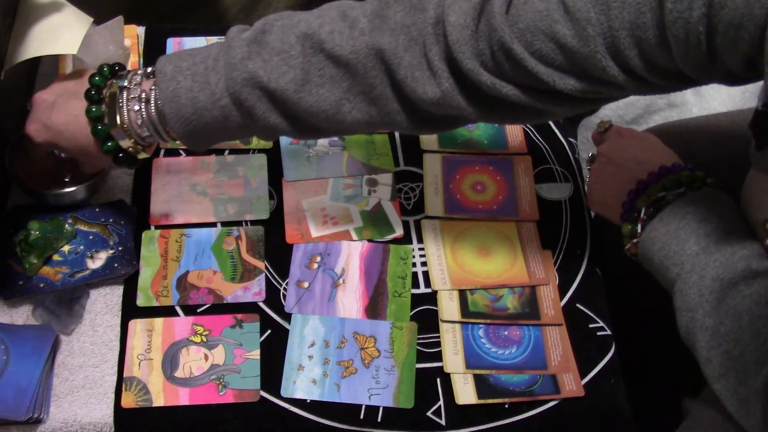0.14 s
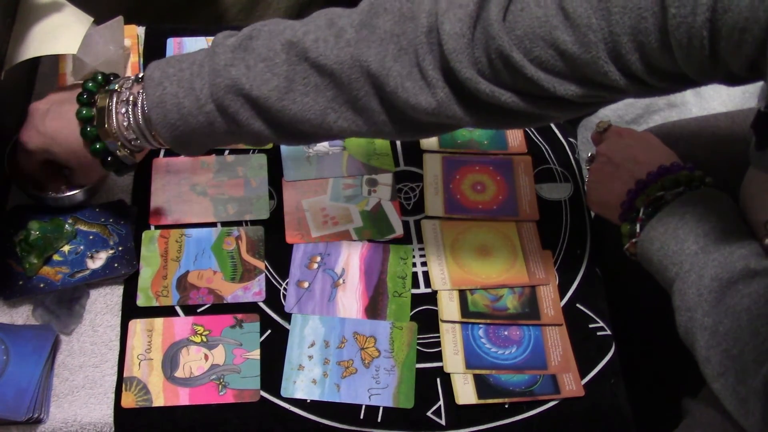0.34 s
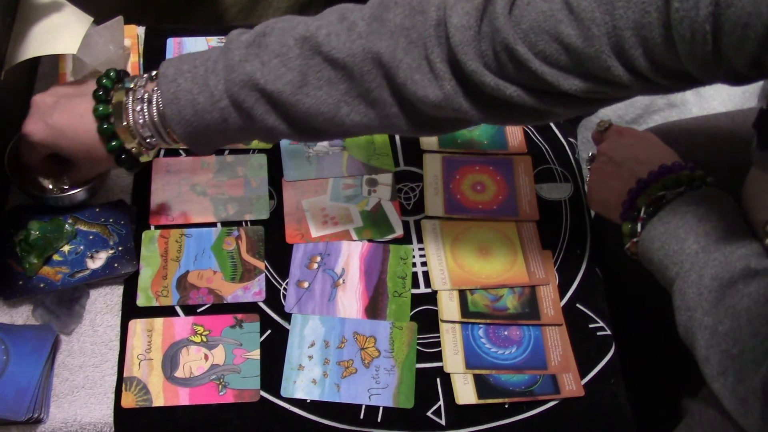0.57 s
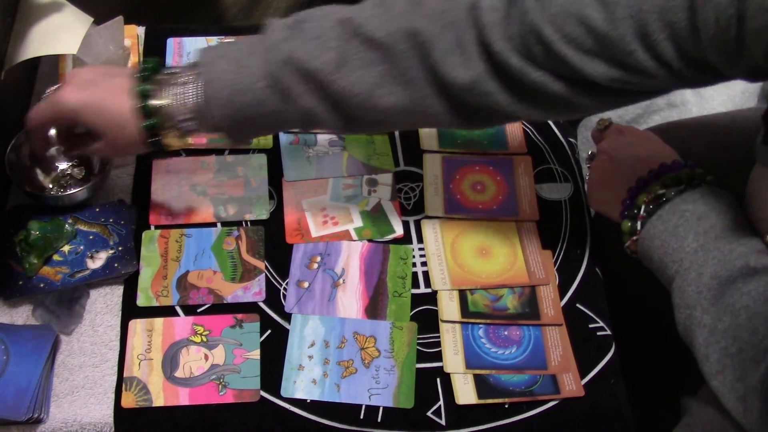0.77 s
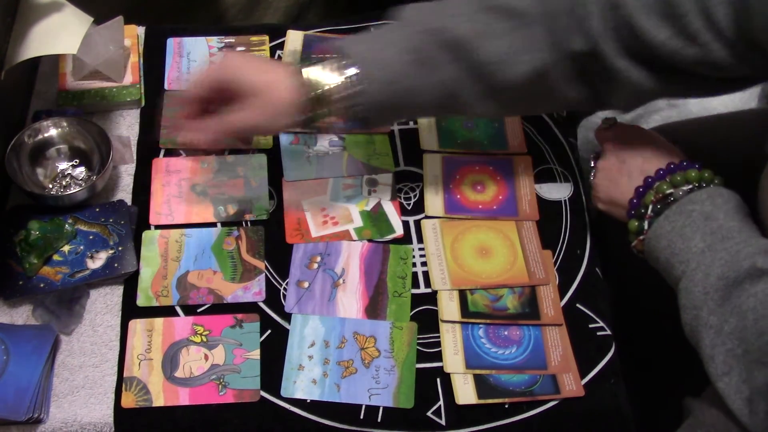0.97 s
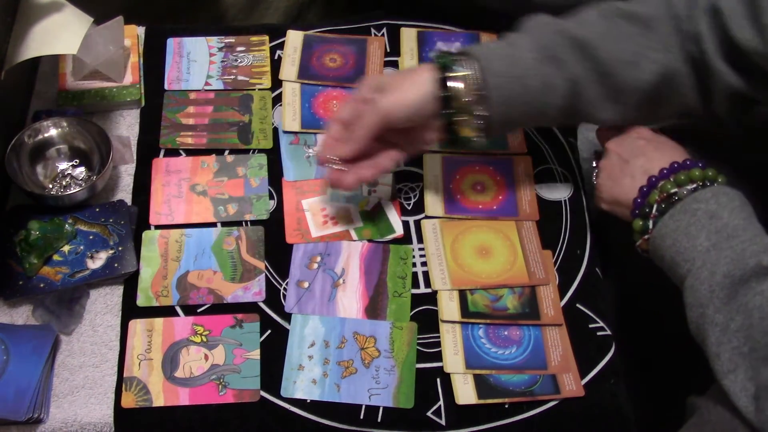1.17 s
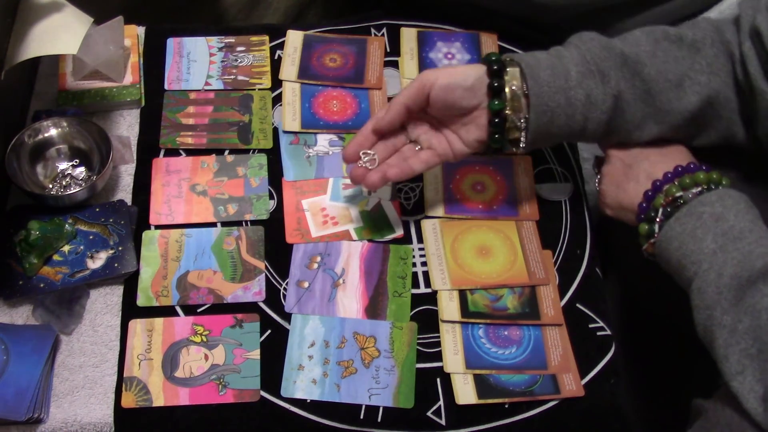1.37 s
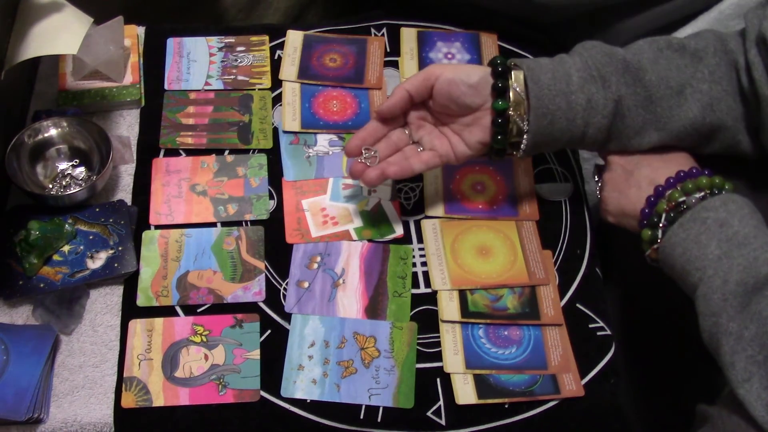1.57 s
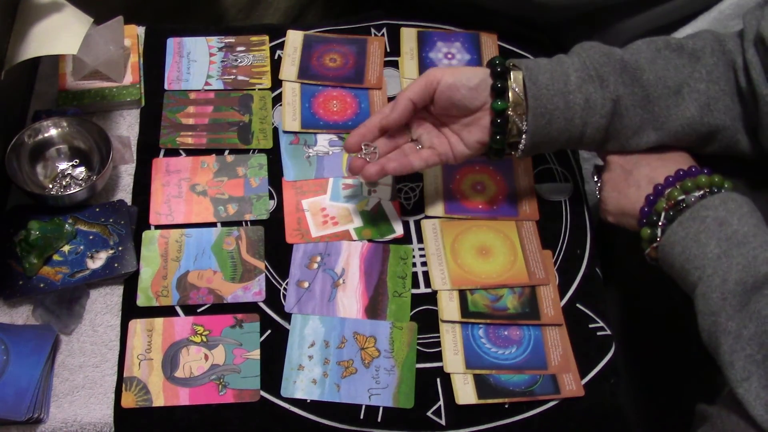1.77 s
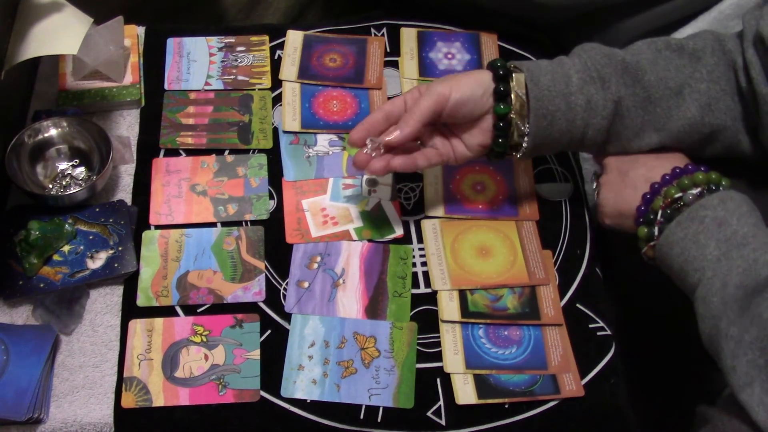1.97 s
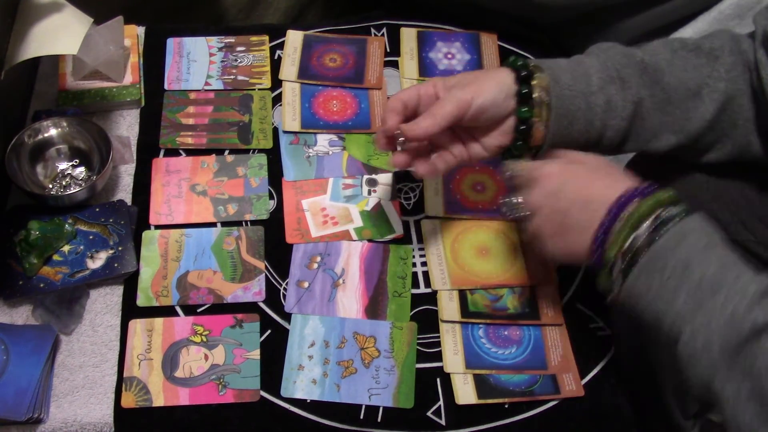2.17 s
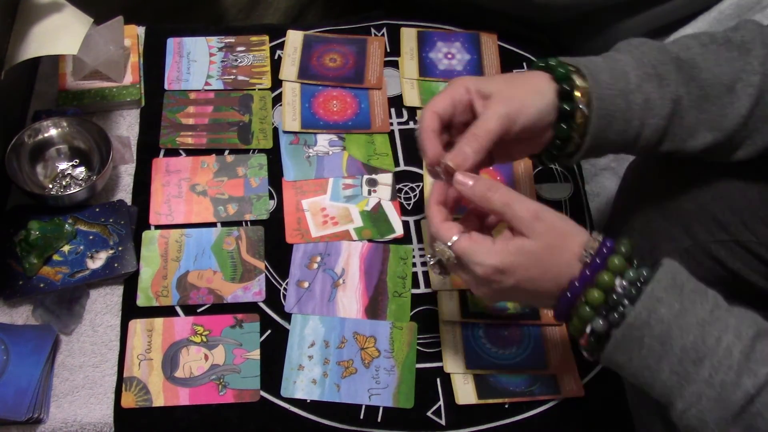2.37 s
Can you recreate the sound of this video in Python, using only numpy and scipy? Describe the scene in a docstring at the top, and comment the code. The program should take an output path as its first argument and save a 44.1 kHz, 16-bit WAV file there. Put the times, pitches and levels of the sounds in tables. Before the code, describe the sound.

Small metal charms jingle and clink in a steel bowl, then tick faintly in a hand.

```python
"""A quiet room, the microphone close to a steel bowl of small metal charms. Fingers rummage in the heap:
countless light contacts and some hard clinks ring charms and bowl, the heap knocks on the bottom, and
charms drag along the wall. From 0.8 s the hand lifts a few away: chain links rustle, a sleeve brushes,
and the charms tick in the palm under rubbing fingertips. Last, bracelet beads click as the arms move."""
import sys
import numpy as np
from scipy import signal
from scipy.fft import rfft, irfft
from scipy.io import wavfile

SR = 44100
rng = np.random.default_rng(int(sys.argv[2]) if len(sys.argv) > 2 else 0)


def to_wav(s):
    """Save 16-bit WAV."""
    ch = np.atleast_2d(s).T  # columns
    pcm = np.round(np.clip(ch, -1, 1) * 32767)  # PCM
    wavfile.write(sys.argv[1], SR, pcm.astype(np.int16))


N = 107295
T = np.arange(N) / SR
AGE, TAIL = T[:SR // 16], T[:SR // 3]  # time since a blow: short sounds, long rings

# room tone spectrum: f/Hz, level/dB
AIR_COLOUR = [(20, -30.5), (100, -11.5), (150, -8), (220, 0.5), (330, -5), (500, -7.5), (2000, -18),
              (9000, -29.5), (16000, -40)]
# how the loaded bowl radiates: f/Hz, level/dB
BOWL_COLOUR = [(100, -34.5), (480, -21.5), (800, -15), (1220, -12), (1550, -2.5), (1950, -14.5),
               (2450, -14), (2900, -7.5), (3350, -8), (3880, -3), (4250, -8.5), (5000, -8.5), (5450, -1),
               (5950, -3.5), (6500, -9), (8500, -9), (9300, -12.5), (10100, -8), (11900, -21.5),
               (16000, -24)]
# stirring of the heap: t/s, level/dB
STIR_CURVE = [(0, -34), (.04, -56), (0.063, -28.5), (.082, -36), (.112, -28.5), (.165, -26), (.205, -26.5),
              (.236, -40), (.275, -25.5), (0.341, -39.5), (0.399, -27), (.428, -31.5), (.446, -40),
              (0.499, -36), (0.551, -27.5), (.612, -28), (0.638, -25.5), (.70, -40.5), (0.746, -52.5)]
# lasting modes of the bowl: f/Hz, level/dB, t60/s
BOWL_MODES = [(1597, -11, .15), (3137, -13, .12), (3610, -9, .11), (3718, -7, .11), (3837, -3, .13),
              (3994, -6, .11), (5390, -4, .09)]
# hard clinks: t/s, level/dB, main mode f/Hz, its relative level/dB
CLINKS = [(0.0195, -35, 5500, -8.5), (0.0485, -26.5, 5630, -10.5), (0.053, -20.5, 5380, -3.5),
          (0.06, -14.5, 3030, -9), (0.0917, -19, 5700, -13.5), (0.1012, -16.5, 4100, -12),
          (0.1056, -17.5, 5390, -1), (0.111, -9, 5530, -1), (0.1204, -18, 5750, 0), (0.1269, -7, 5400, 7),
          (0.1378, -17.5, 3887, -1.5), (0.1579, -22, 9970, -1), (.193, -23, 3820, 3),
          (0.2492, -28, 5655, -9.5), (0.2566, -22, 7950, -7.5), (0.356, -24, 5860, -13),
          (0.3625, -16, 8570, -12), (0.3857, -18.5, 6060, -1), (0.4073, -20, 5640, 5.5),
          (0.428, -24, 5500, 0.5), (0.527, -22.5, 5660, -6), (0.5484, -17.5, 5360, -5),
          (0.559, -19, 5620, 0), (0.6626, -15.5, 3620, -6.5), (0.677, -22.5, 5670, 4),
          (0.6969, -27.5, 3720, -3.5), (0.7029, -25.5, 5870, -6)]
# heap knocking on the bottom: t/s, level/dB
KNOCKS = [(0.099, -18), (0.1046, -22), (.1118, -27.5), (0.1368, -22), (0.1588, -27), (.198, -29.5),
          (.407, -34), (.4615, -29.5), (.468, -32.5)]
# modes of the loaded bottom: f/Hz, level/dB, t60/s
BOTTOM_MODES = [(930, -5, .032), (1120, -6, .025), (1440, 0, .034)]
# band edges of the thud: f/Hz
THUD_BAND = [560, 1600]
# charms struck free: t/s, level/dB, f/Hz, t60/s
FREE_RINGS = [(.1118, -20, 10592, .22), (.1278, -24, 5390, .2), (.1278, -25, 3837, .3),
              (.1585, -20, 9838, .11)]
# dragging along the wall: t/s, level/dB
DRAG_CURVE = [(.52, -55.5), (.575, -31.5), (.64, -31), (.70, -39), (.73, -58)]
# modes the dragging sustains: f/Hz, level/dB
WALL_MODES = [(3530, -2), (3625, -1), (3880, -1), (4002, 2), (10030, -1), (10600, 1)]
# chain links rustling: t/s, level/dB
RUSTLE_CURVE = [(.78, -79), (1.02, -64), (1.12, -90.5)]
# contact noise of links and held charms: f/Hz, level/dB
TICK_COLOUR = [(200, -33.5), (2000, -18), (5800, -11.5), (7200, -0.5), (10000, -4), (13000, -18.5),
               (16000, -20.5)]
# sleeve brushing: t/s, level/dB
SLEEVE_CURVE = [(.8, -75), (1.03, -68.5), (1.27, -73), (1.35, -56), (1.43, -65), (1.9, -78), (2.07, -67),
                (2.18, -66.5), (2.205, -58), (2.26, -78)]
# its spectrum: f/Hz, level/dB
SLEEVE_COLOUR = [(100, -19.5), (1100, 8), (2000, -3), (2550, 3.5), (4000, -8), (9000, -11), (16000, -19)]
# ticks in the palm: t/s, level/dB, main mode f/Hz, t60/s
TICKS = [(0.832, -44.5, 9400, 0.0066), (0.914, -47, 9000, .009), (1.0419, -40.5, 8360, 0.02),
         (1.1643, -38.5, 7600, 0.019), (1.1864, -45.5, 9700, 0.028), (1.2189, -42, 10420, 0.022),
         (1.4107, -42, 13000, 0.022), (1.419, -39.5, 9130, 0.016), (1.952, -48, 7070, 0.035),
         (2.003, -43, 7920, .03), (2.012, -41, 7420, 0.047), (2.041, -44.5, 7700, 0.11),
         (2.0593, -40.5, 7800, 0.036), (2.069, -44, 6920, 0.045), (2.118, -40.5, 7180, 0.044),
         (2.132, -42, 7570, 0.056), (2.151, -46, 7800, 0.095), (2.1723, -42.5, 10400, 0.038),
         (2.215, -37, 9360, 0.029), (2.225, -33.5, 9440, 0.016)]
# modes of the held charms: f/Hz, level/dB
HELD_MODES = [(7110, -3), (7910, -28), (8690, 3), (9440, 1), (10400, 6), (11800, -1.5), (12900, 1),
              (15100, -6)]
# fingertips sliding: t/s, level/dB
SLIDE_CURVE = [(1.2, -90), (1.4, -71), (1.85, -72), (2, -89.5)]
# soft finger rubs: t/s, level/dB
RUBS = [(1.522, -54.5), (1.922, -53.5)]
# bracelet bead clicks: t/s, level/dB, f/Hz
BEADS = [(2.1914, -32, 5010), (2.2734, -43, 11900), (2.2844, -51, 10400), (2.3119, -42, 8250),
         (2.3406, -49, 8500)]
# their contact noise: f/Hz, level/dB
BEAD_COLOUR = [(200, -35), (1200, -7.5), (3100, -1), (4000, -12), (5000, -1), (8300, 6), (12000, -9),
               (16000, -16)]

STIR_END_S, CLICK_T60_S = .74, .007


def amp(db):
    """Decibels to gain."""
    return 10 ** (np.asarray(db) / 20)


def unit(x):
    """Scale to unit energy."""
    return x / np.sqrt(np.sum(x ** 2))


def fade(t60, age):
    """Exponential decay, 60 dB down after t60 seconds."""
    return np.exp(-np.log(1000) * age / t60)


def tone(hz, t60, age=AGE):
    """One dying mode."""
    return np.sin(2 * np.pi * hz * age) * fade(t60, age)


def crack(t60, age=AGE):
    """The brief noise of a contact."""
    return unit(rng.standard_normal(len(age)) * fade(t60, age))


def band(x, hz, kind):
    """Gentle high-pass or band-pass."""
    return signal.lfilter(*signal.butter(2, hz, kind, fs=SR), x)


def colour(x, points, size=2048):
    """Causal filter through (f/Hz, level/dB) points that keeps the power of white noise."""
    hz, db = np.array(points).T
    bins_hz = np.arange(size // 2 + 1) * SR / size
    gain = amp(np.interp(np.log(bins_hz + 1), np.log(hz), db))
    cepstrum = irfft(np.log(gain))
    cepstrum[1:size // 2] *= 2  # fold to minimum phase
    cepstrum[size // 2 + 1:] = 0
    impulse = unit(irfft(np.exp(rfft(cepstrum))))
    return signal.fftconvolve(x, impulse)[:len(x)]


def add(track, s, db, sound, rise_s=.001):
    """Lay a blow on the track; its level is its energy spread over 2 ms."""
    start = max(int(s * SR), 0)
    blow = unit(sound * (1 - np.exp(-AGE / rise_s))) * np.sqrt(SR * .002)
    track[start:start + len(AGE)] += amp(db) * blow[:N - start]


def along(x, curve, length_s=N / SR):
    """Give a texture of this length the level of a (t/s, level/dB) curve."""
    return unit(x) * np.sqrt(length_s * SR) * amp(np.interp(T, *np.array(curve).T))


def room_tone(level_db=-56.5, hum_hz=178, hum_db=-70.5):
    """Steady air of the room with a faint hum, wider in the bass."""
    mid, side = (amp(level_db) * colour(rng.standard_normal(N), AIR_COLOUR) for _ in range(2))
    side_bass = signal.lfilter(*signal.butter(1, 562, fs=SR), side)
    side = amp(-15) * side_bass + amp(-8.5) * side
    mid += amp(hum_db) * np.sqrt(2) * np.sin(2 * np.pi * hum_hz * T)
    return np.array([mid + side, mid - side])


def charm(mode_count=28, mean_t60=.017):
    """One charm touched in the heap: a crack and its own short modes, coloured by the bowl."""
    ring = sum(tone(2500 + 13000 * pitch, mean_t60 * (.5 + decay)) * (weight - .5)
               for pitch, decay, weight in rng.random((mode_count, 3)))
    return unit(colour(unit(ring) + amp(4) * crack(t60=.011), BOWL_COLOUR))


def stirred_heap(count=80, contacts_per_s=1600):
    """Stirred charms touch densely, mostly lightly, now and then harder."""
    out = np.zeros(N)
    charms = [charm() for _ in range(count)]
    contacts = rng.random((int(STIR_END_S * contacts_per_s), 3))
    for k, (late, softness, which) in enumerate(contacts):
        s = (k + 2 * late - 1) / contacts_per_s
        db = -4 * np.log(max(softness, .03))
        add(out, s, db, charms[int(which * count)])
    return out


def bowl_ring(blows, relative_db=-19):
    """Blows keep the steel bowl ringing in its lasting modes."""
    modes = sum(amp(db) * tone(hz, t60, TAIL) for hz, db, t60 in BOWL_MODES)
    ring = unit(signal.fftconvolve(blows, modes)[:N])
    return amp(relative_db) * ring * np.linalg.norm(blows)


def clinks(t60=.0089, chatter_s=.0023):
    """Hard hits: the main mode holds while the contact chatters, then dies away."""
    out = np.zeros(N)
    hold = 1 / fade(t60, np.minimum(AGE, chatter_s))
    for s, db, hz, main_db in CLINKS:
        main = amp(main_db) * unit(tone(hz, t60) * hold)
        add(out, s, db, charm() + main, rise_s=.0015)
    return out


def knocks(detune=.0314):
    """The heap drops on the bottom: a short thud and damped modes, detuned by the shifting load."""
    out = np.zeros(N)
    for s, db in KNOCKS:
        ring = sum(amp(mode_db) * tone(hz * (1 + detune * rng.standard_normal()), t60)
                   for hz, mode_db, t60 in BOTTOM_MODES)
        thud = band(crack(t60=.014), THUD_BAND, "band")
        add(out, s, db, unit(ring) + amp(-10.5) * unit(thud))
    return out


def free_rings():
    """A charm struck free rings on."""
    out = np.zeros(N)
    for s, db, hz, t60 in FREE_RINGS:
        start = int(s * SR)
        out[start:start + len(TAIL)] += amp(db) * tone(hz, t60, TAIL)
    return out


def wall_drag(heap, t60=.08):
    """Charms dragged along the wall keep it shimmering."""
    wall = sum(amp(db) * tone(hz, t60, TAIL) for hz, db in WALL_MODES)
    return along(signal.fftconvolve(heap, wall)[:N], DRAG_CURVE, STIR_END_S)


def chain_rustle(touches_per_s=90):
    """Tiny links touch at random as the arm moves."""
    touches = (rng.random(N) < touches_per_s / SR) * rng.standard_normal(N)
    clicks = signal.fftconvolve(touches, crack(CLICK_T60_S))[:N]
    return along(colour(clicks, TICK_COLOUR), RUSTLE_CURVE)


def sleeve():
    """A sleeve brushes and beads slide in faint swells of noise."""
    swell = amp(np.interp(T, *np.array(SLEEVE_CURVE).T))
    return swell * colour(rng.standard_normal(N), SLEEVE_COLOUR)


def palm_ticks(detune=.022, decay_share=.77):
    """Held charms tick, each with its own mix and tuning of modes; the palm damps the lesser ones."""
    out = np.zeros(N)
    for s, db, main_hz, t60 in TICKS:
        spread = rng.standard_normal((len(HELD_MODES), 2))
        lesser = sum(amp(mode_db) * weight * tone(hz * (1 + detune * offset), t60 * decay_share)
                     for (hz, mode_db), (weight, offset) in zip(HELD_MODES, spread))
        scrape = unit(colour(crack(t60), TICK_COLOUR))
        add(out, s, db, unit(tone(main_hz, t60)) + unit(lesser) + amp(4) * scrape)
    return out


def finger_rubs(centre_hz=2476):
    """Fingertips slide softly on the charms, with two short muffled rubs."""
    edges = [centre_hz / 1.1, centre_hz * 1.1]
    friction = along(rng.standard_normal(N), SLIDE_CURVE)
    out = unit(band(friction, edges, "band")) * np.linalg.norm(friction)
    for s, db in RUBS:
        add(out, s, db, band(crack(t60=.036), edges, "band"))
    return out


def bead_clicks():
    """Bracelet beads collide: a sharp crack and a short ping."""
    out = np.zeros(N)
    for s, db, hz in BEADS:
        click = unit(colour(crack(CLICK_T60_S), BEAD_COLOUR))
        ping = unit(tone(hz, t60=.0091))
        add(out, s, db, click + amp(-4.5) * ping, rise_s=.0002)
    return out


def room(x, pan_db, room_db, t60=.125, gap_s=.0018):
    """Add the short tail of a furnished room; only the treble is panned, positive to the left."""
    responses = [unit(crack(t60, TAIL) * (TAIL > gap_s)) for _ in range(2)]
    mid, side = (amp(room_db) * signal.fftconvolve(x, response)[:N] for response in responses)
    lean = (amp(pan_db) - 1) / (amp(pan_db) + 1)
    side = lean * x + amp(-12.5) * side
    side = signal.filtfilt(*signal.butter(1, 2000, "high", fs=SR), side)
    return np.array([x + mid + side, x + mid - side])


def scene():
    """Close up: the bowl just left of the microphone, the hand just right and drier."""
    air = room_tone()
    heap = stirred_heap()
    stir = along(band(heap, 780, "high"), STIR_CURVE, STIR_END_S)  # light contacts hardly move the bottom
    blows = stir + clinks() + knocks() + wall_drag(heap)
    bowl = blows + bowl_ring(blows) + free_rings()
    hand = chain_rustle() + sleeve() + palm_ticks() + finger_rubs() + bead_clicks()
    return air + room(bowl, pan_db=1.3, room_db=-8) + room(hand, pan_db=-1.4, room_db=-12)


def record(dry, ceiling=.85, top_hz=16200):
    """The recorder flattens any peak over its ceiling and cuts the top."""
    low_pass = signal.ellip(10, .2, 70, top_hz, fs=SR, output="sos")
    return signal.sosfilt(low_pass, np.clip(dry, -ceiling, ceiling))


dry = scene()
out = record(dry)
to_wav(out)
```